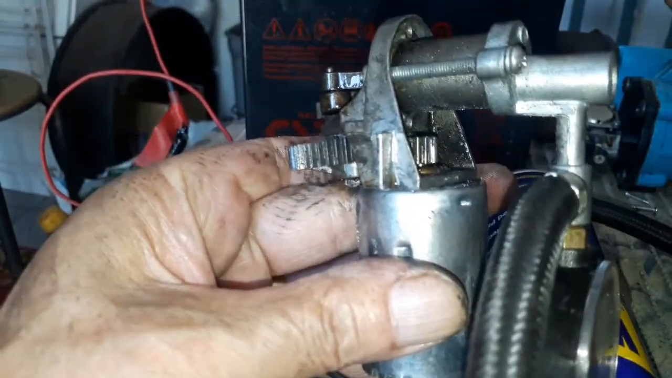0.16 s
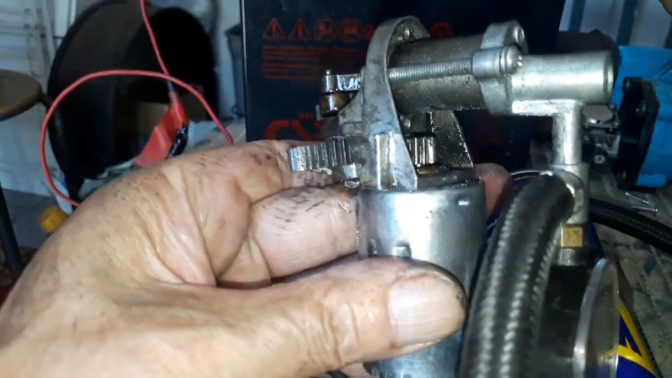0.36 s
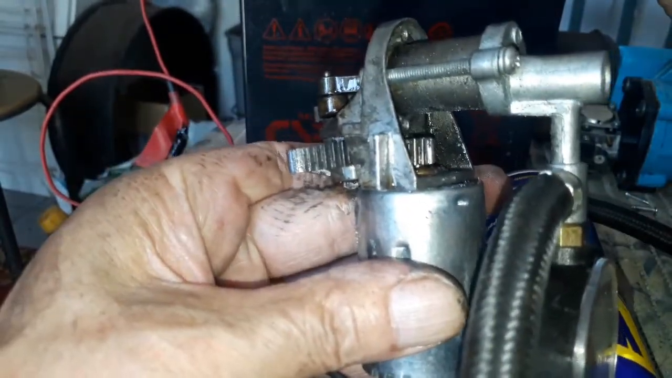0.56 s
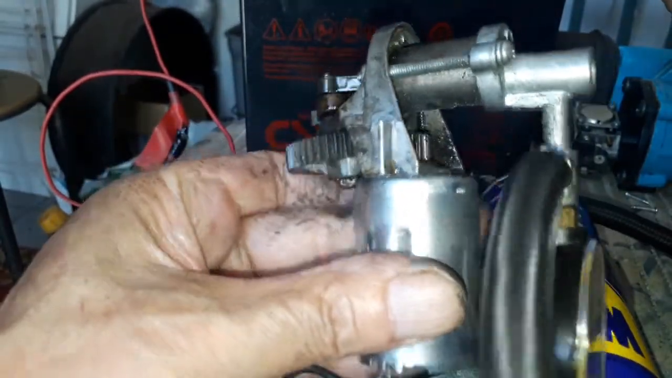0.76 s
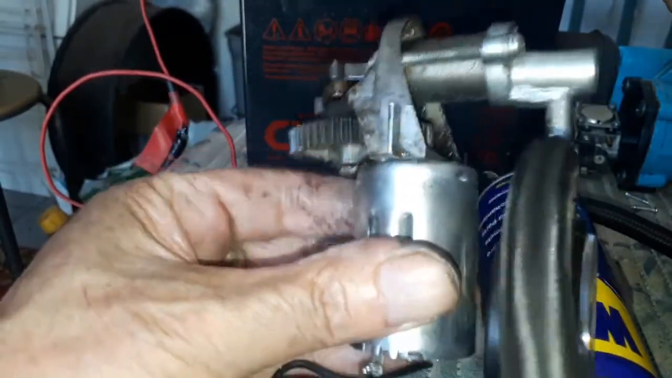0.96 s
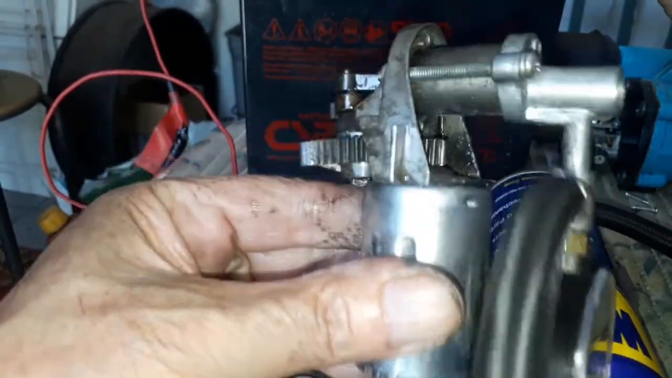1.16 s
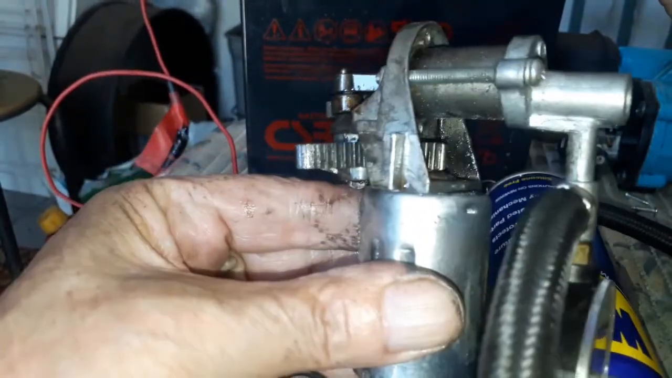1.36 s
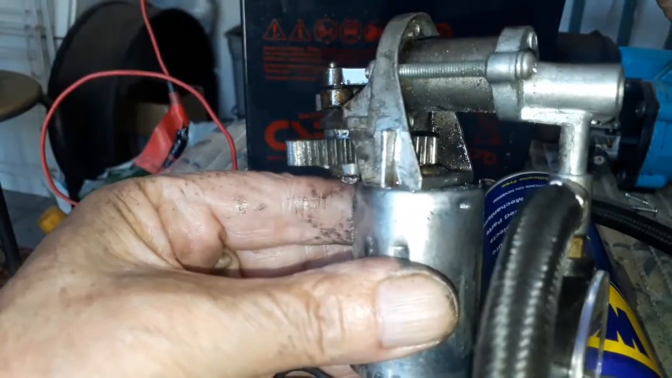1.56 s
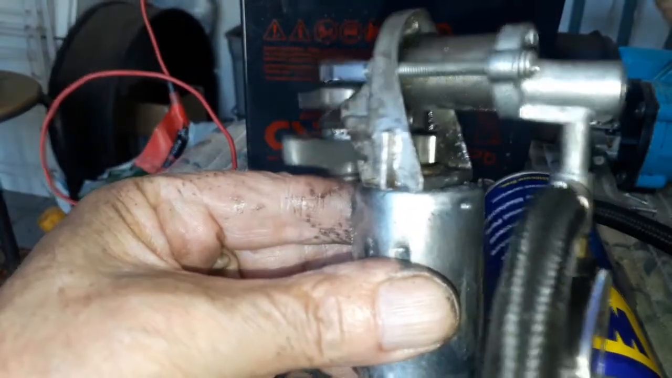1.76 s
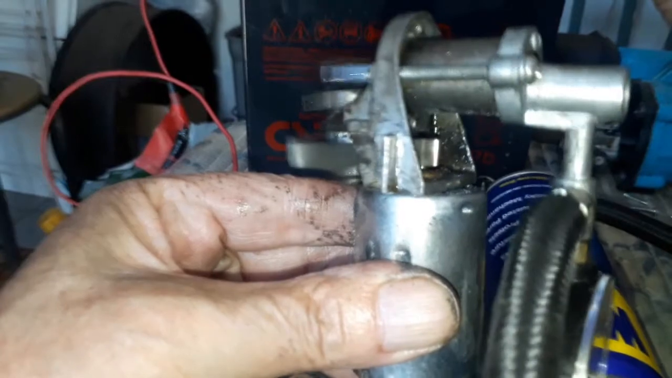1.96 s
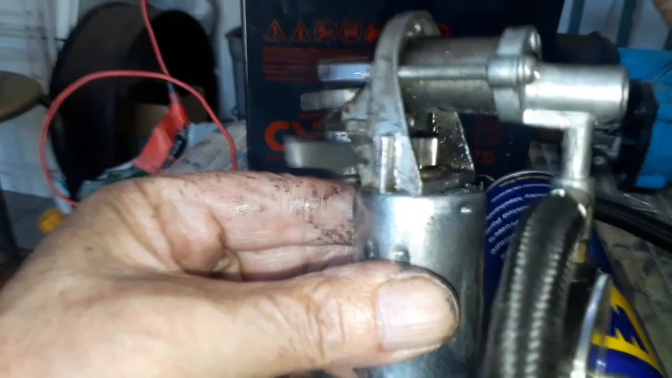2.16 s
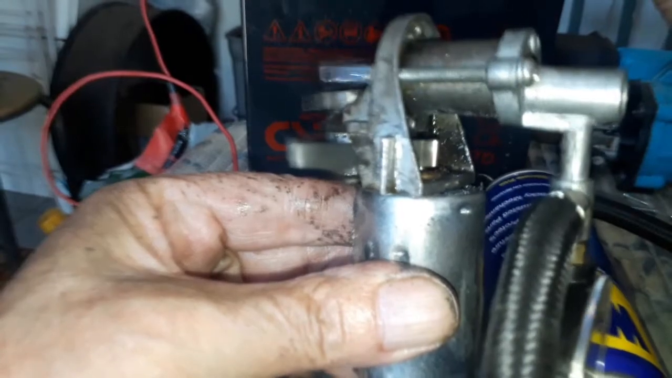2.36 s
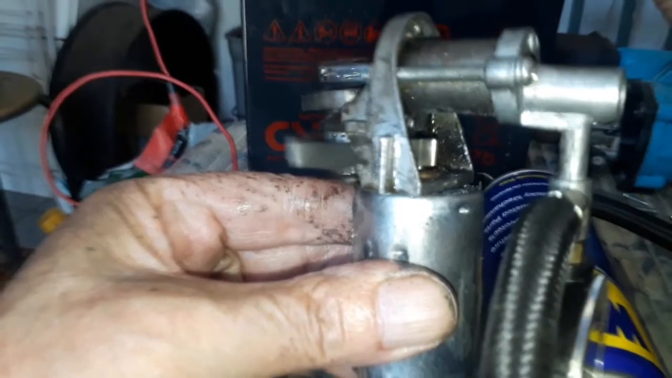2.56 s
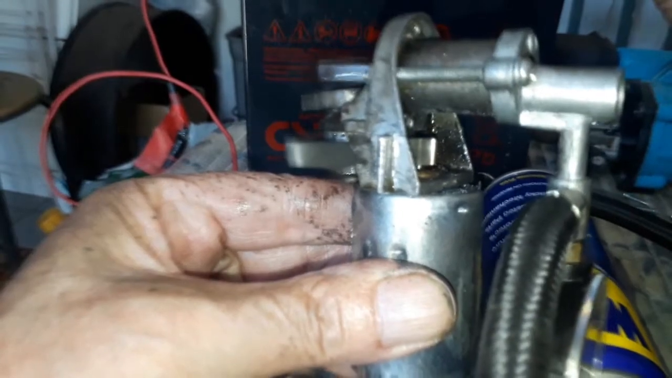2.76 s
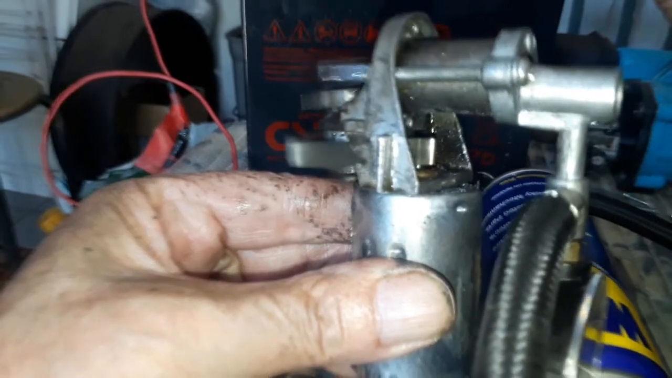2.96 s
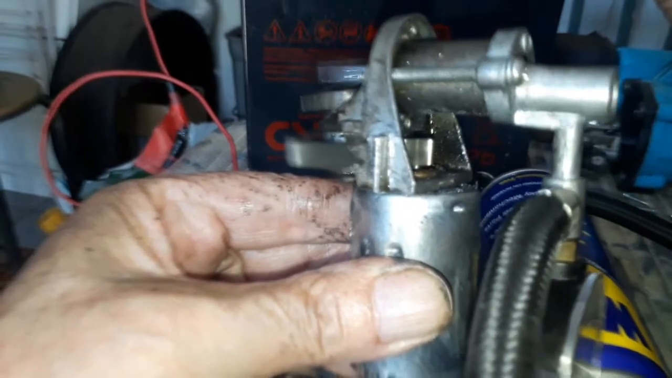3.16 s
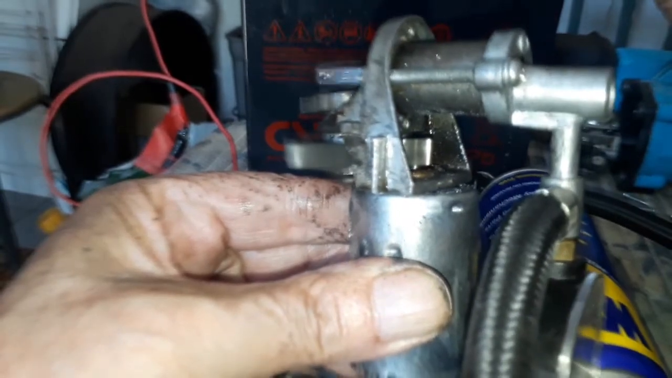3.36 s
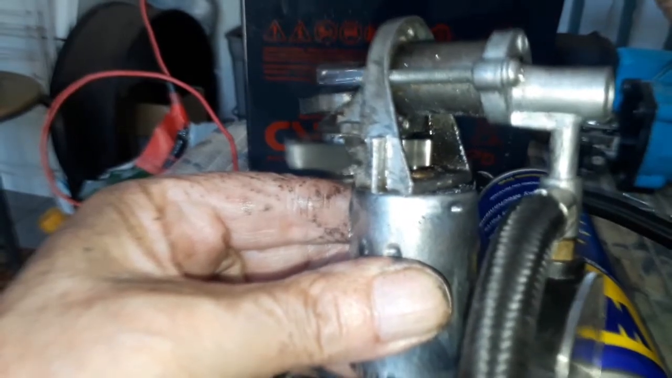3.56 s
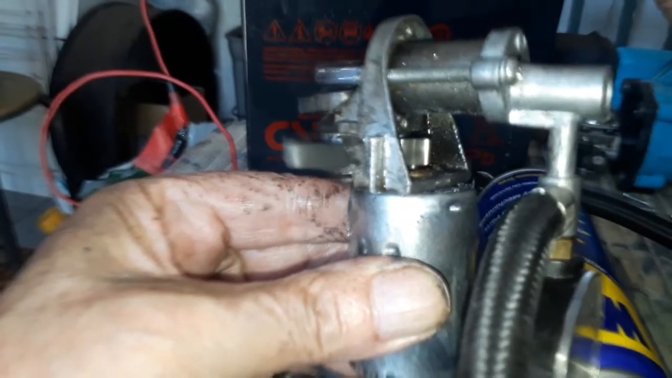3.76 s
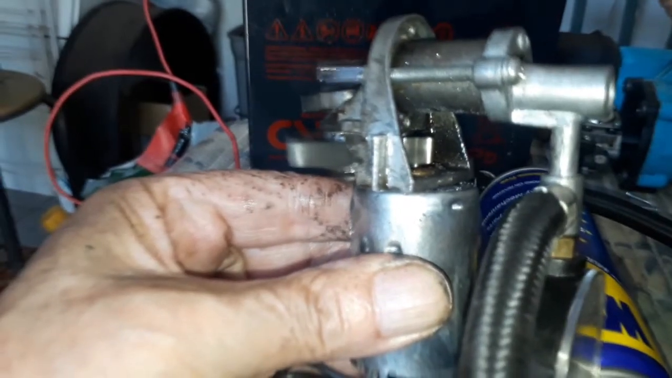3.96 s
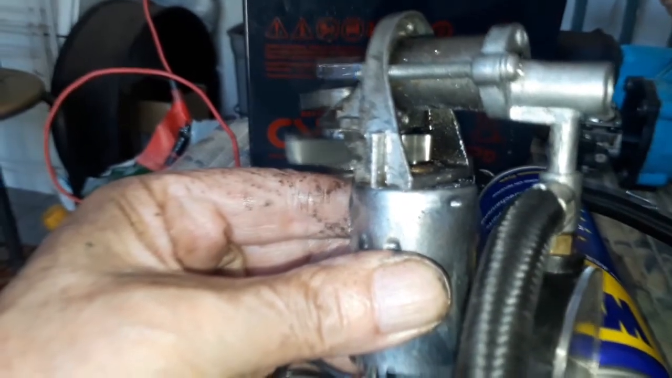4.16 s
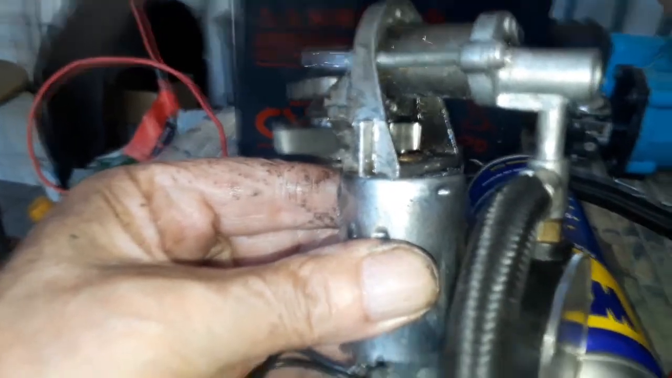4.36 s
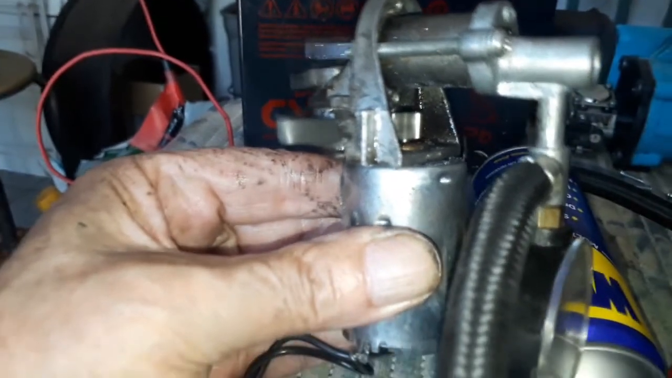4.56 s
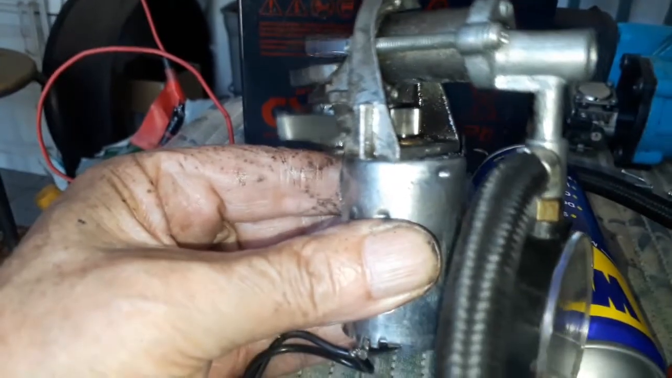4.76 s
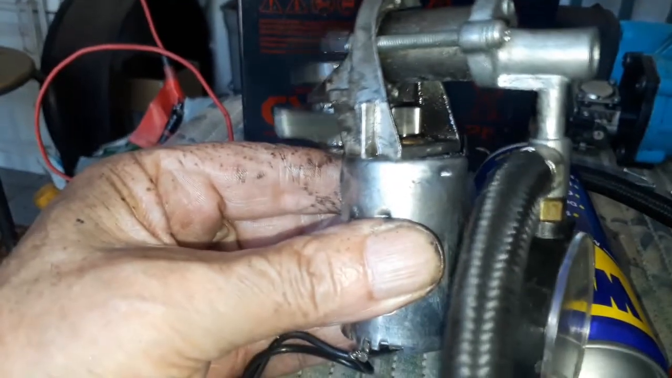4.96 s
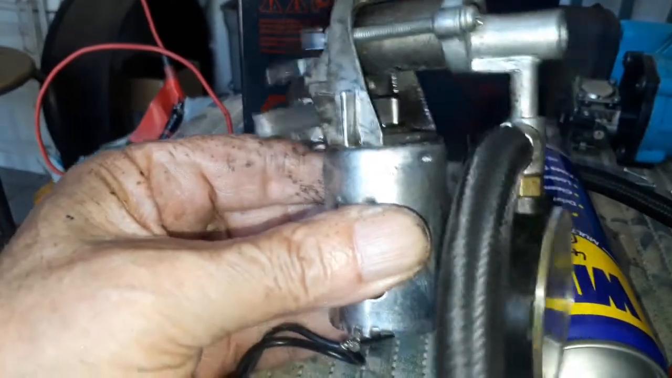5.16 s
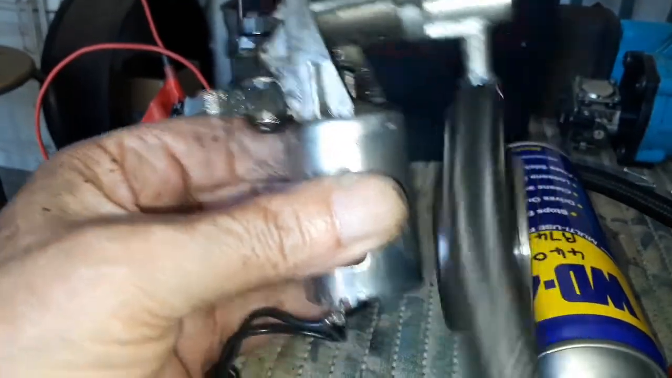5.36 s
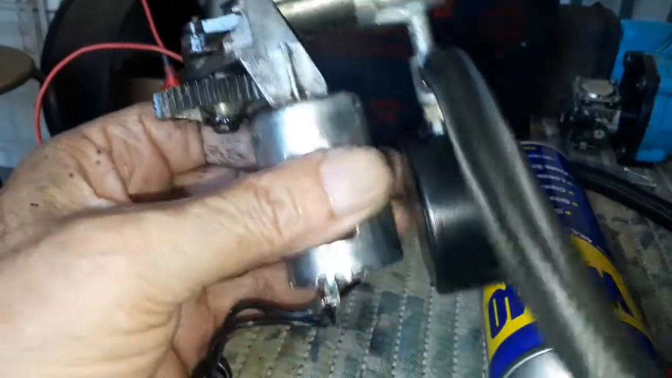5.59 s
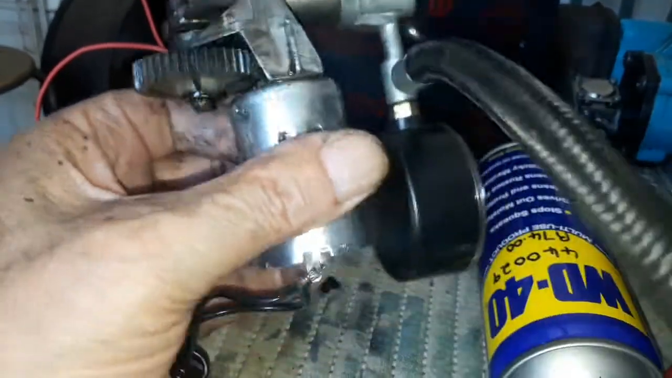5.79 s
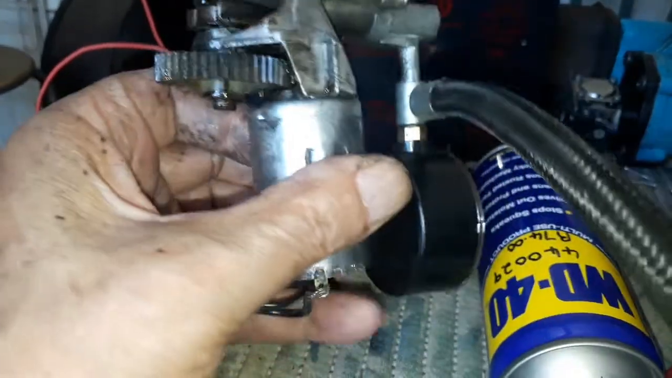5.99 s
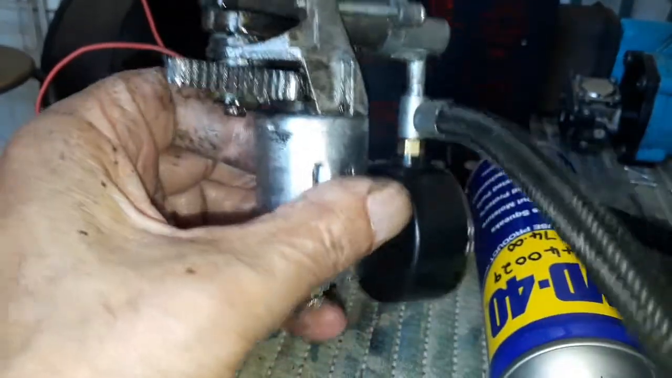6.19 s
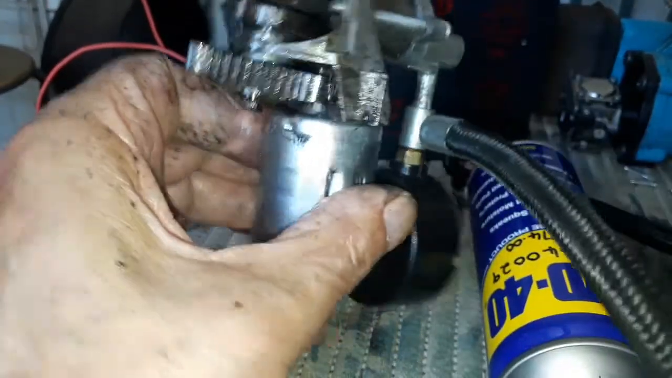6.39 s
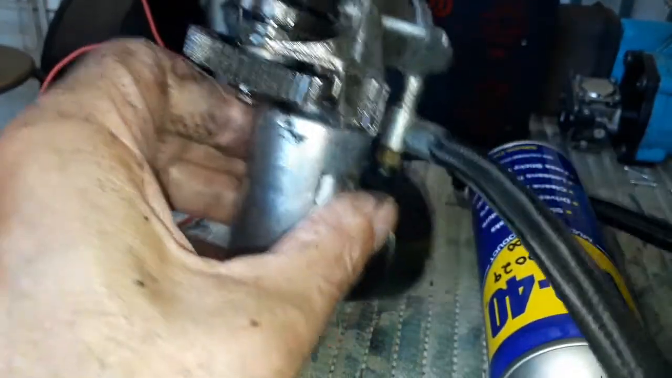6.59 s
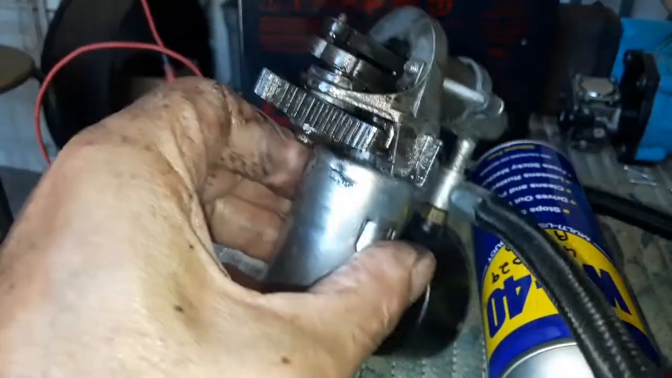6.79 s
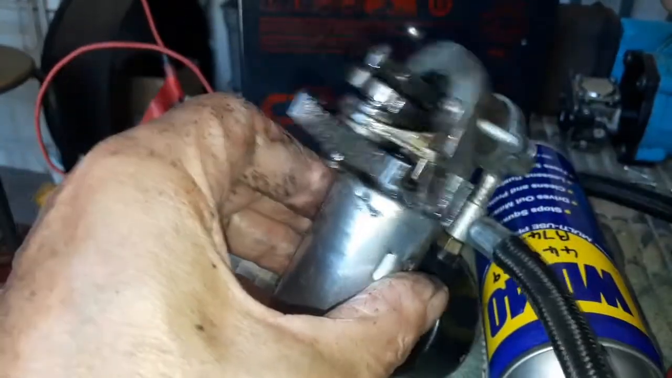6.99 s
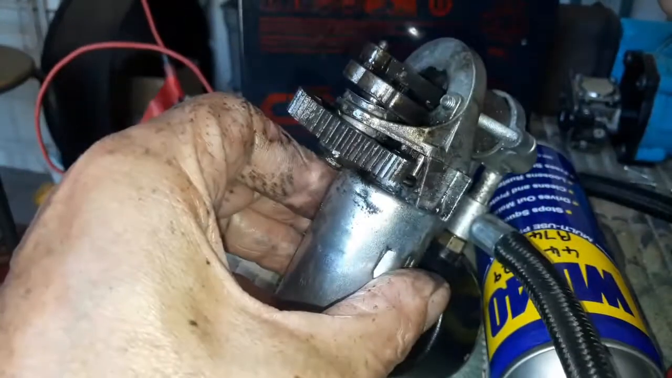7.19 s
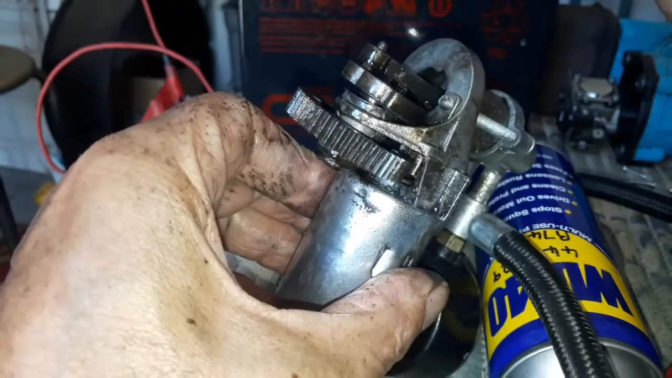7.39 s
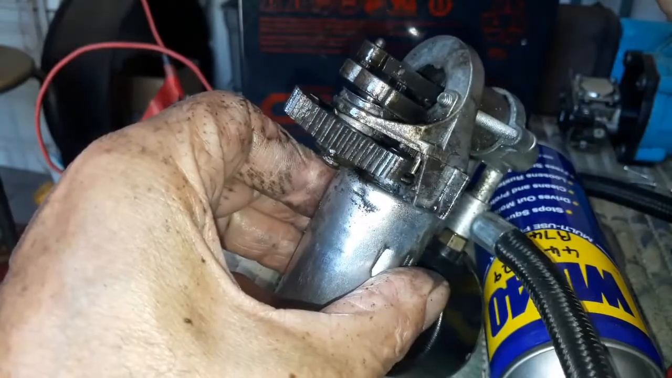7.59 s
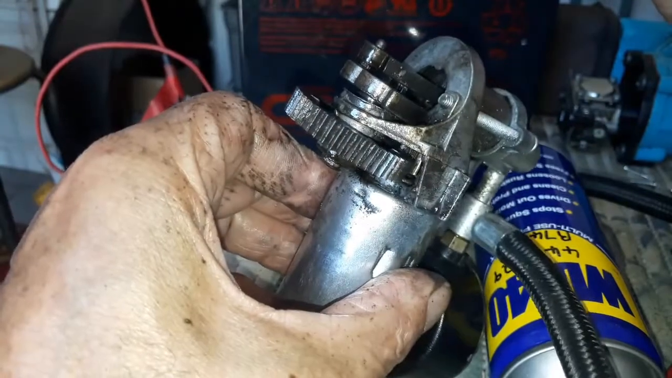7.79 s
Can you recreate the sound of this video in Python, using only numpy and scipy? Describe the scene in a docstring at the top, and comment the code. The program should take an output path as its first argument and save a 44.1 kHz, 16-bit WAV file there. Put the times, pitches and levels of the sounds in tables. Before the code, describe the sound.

A near-silent room with slight handling noise is broken by a small motor-driven pump spinning up almost instantly. Its loose rod hammers in a dense, harsh metallic buzz, with grinding gears and low-mid hum, very near and loud. Small momentary dips turn to watery ringing. After switch-off the rattle slows and thickens into thuds, ending in a quick flurry of taps, then faint clicks and rubs.

```python
"""In a small quiet workshop, a bare piston compressor is held in a hand close to the microphone.
It runs for about three seconds and coasts to a stop. A motor drives its crank through a gear, heard as
hum and scraping noise. The loose rod knocks at both ends of each stroke and rings the cast body.
At moments the sound dips and a brief swell of ringing noise bands takes its place. Before and after
the run, the hand shifts its grip: struck tones make faint clicks and ticks, noise makes bumps and rubs."""
import sys
import numpy as np
from scipy import signal
from scipy.fft import rfft, irfft, next_fast_len
from scipy.io import wavfile
from scipy.ndimage import map_coordinates

SR = 44100
rng = np.random.default_rng(int(sys.argv[2]) if len(sys.argv) > 2 else 0)


def bounce(signal):
    """Save signal as a 16-bit WAV file at the path given by the first command-line argument."""
    frames = np.transpose(np.atleast_2d(signal))
    limited = np.clip(frames, -1, 1)
    pcm = np.round(limited * 32767).astype(np.int16)
    wavfile.write(sys.argv[1], SR, pcm)


N = 345556

# Levels in the tables are relative: the functions set the final loudness.
# the two ends of the stroke: (place [turns], extra when slow [turns], level [dB],
# timing scatter [s], time to fall 60 dB [s], rebound level [dB])
STROKE_ENDS = [(-.005, -.02, 1.5, 0.00023, 0.0092, -4.5), (.465, .1, -0.2, 0.00034, .0095, -10)]
# extra single knocks during spin-up and coasting, some on the return stroke: (time [s], level [dB])
SINGLE_KNOCKS = [(1.762, -25.5), (1.789, -10.5), (1.796, -11.5), (1.821, -14.5), (4.792, -18), (4.865, -17),
                 (5.034, -19), (5.18, -33.5)]
# moments when the sound dips and smears into ringing noise: (time [s], level [dB])
SMEAR_TIMES = [(2.177, -10.5), (2.304, -12.5), (2.455, -15), (2.669, -15), (2.775, -13), (3.628, -14),
               (3.67, -13.5), (4.35, -12), (4.675, -13), (4.857, -15.5), (5.097, -21.5)]
# hum tones; 4.6 is the motor shaft: (multiple of crank speed [-], level [dB])
HUM_TONES = [(1, -8), (3, -3), (4, -20), (4.6, -0.5), (5, 4), (6, -22), (7, -0.5), (8, -15), (9, -1),
             (10, 0.5), (11, -7), (12, -1), (13, 0), (13.8, 0.5), (14.6, -4.5), (23, -16)]
# broad colour of the knocks: (frequency [Hz], level [dB per Hz])
KNOCK_COLOUR = [(25, -44.5), (80, -33.5), (140, -22.5), (230, -12), (360, -13), (650, -8), (1050, -10.5),
                (1600, -6), (2600, 1.5), (6200, 1), (7300, 1.5), (7900, -6.5), (9600, -13.5),
                (16000, -13.5)]
# resonances and dips of the cast body: (frequency [Hz], width [Hz], lift [dB])
BODY_RESONANCES = [(657, 16, 8.5), (1974, 190, 1.5), (3080, 440, 2), (3380, 95, -3.5), (3980, 450, 3.5),
                   (4260, 120, -4.5), (5490, 260, 4), (6455, 210, 4), (6860, 440, 4), (8840, 550, 3.5),
                   (10540, 230, 6.5), (11700, 2100, 5.5), (12590, 800, 3.5)]
# colour of the gear noise: (frequency [Hz], level [dB per Hz])
GEAR_COLOUR = [(35, -46), (80, -27.5), (150, -33), (240, -5.5), (350, -21.5), (650, -8), (1060, -11.5),
               (2100, -3.5), (3000, -7.5), (4420, -6.5), (6900, -2), (8000, -13), (9600, -16), (12700, -17),
               (16000, -16)]
# clicks of loose metal parts: (time [s], level [dB], strongest around [Hz])
CLICK_TIMES = [(.249, -61, 2200), (.749, -56, 2200), (.996, -47.5, 1900), (1.026, -41.5, 5200),
               (1.523, -51.5, 2940), (5.807, -42, 1500), (5.837, -42, 1100), (5.849, -44.5, 4270),
               (6.025, -39.5, 762), (6.271, -55.5, 6000), (6.686, -49.5, 900), (6.997, -48.5, 699),
               (7.025, -59.5, 1500)]
# tones of the loose metal parts: (frequency [Hz], level [dB], time to fall 60 dB [s])
METAL_TONES = [(610, 1.5, 0.04), (760, 4.5, 0.025), (1090, -11, .04), (1530, -8, 0.21), (2000, 1.5, 0.051),
               (2120, -6, 0.066), (2752, -11, 0.026), (4000, -11, 0.033), (4470, -5, 0.03),
               (5770, -17, 0.033)]
# hollow ticks of the hose and gauge: (time [s], level [dB])
TICK_TIMES = [(5.517, -61), (6.464, -47.5), (7.31, -41)]
# hollow tones of the hose and gauge: (frequency [Hz], level [dB], time to fall 60 dB [s])
HOLLOW_TONES = [(415, -16, 0.039), (756, -29, .04), (1043, 4, 0.023), (1138, 3, 0.029), (2070, -16, .04),
                (3700, -21.5, .03)]
# soft bumps of the hand: (time [s], level [dB], treble cut-off [Hz])
HAND_BUMPS = [(0.567, -59, 180), (1.012, -50, 170), (1.236, -45.5, 288), (1.526, -59, 450),
              (5.519, -60, 700), (5.842, -54, 260), (6.466, -58, 400), (6.69, -57, 220), (6.743, -53, 300),
              (7.003, -50, 130)]
# fingers sliding on metal: (time [s], level [dB], half length [s], strongest around [Hz])
FINGER_RUBS = [(0.872, -65.5, 0.022, 602.3), (0.993, -60, 0.02, 2010), (1.113, -61, 0.033, 500),
               (1.108, -71, .025, 5500), (5.677, -67.5, .018, 5600), (5.782, -69, 0.061, 1300),
               (6.008, -63, .045, 856), (6.434, -72, 0.027, 1097), (6.776, -68.5, 0.036, 1100),
               (6.981, -56, .028, 750)]
# colour of skin sliding on metal: (frequency [Hz], level [dB per Hz])
SKIN_COLOUR = [(120, -35), (200, -13), (363, -5), (708, -7), (1170, -8.5), (2060, -14.5), (3350, -16.5),
               (4010, -17.5), (6770, -14), (9550, -32.5), (15000, -26)]
# colour of the quiet background: (frequency [Hz], level [dB per Hz])
AIR_COLOUR = [(20, -20), (45, -28.5), (75, -14), (120, -8), (190, -10), (280, -13.5), (420, -17.5),
              (1060, -24), (3000, -27.5), (5500, -32), (6800, -30), (8200, -39), (11500, -34),
              (16000, -33.5)]
# how long the room's echo lasts: (frequency [Hz], time to fall 60 dB [s])
ROOM_DECAY = [(150, .22), (1500, .3), (2100, .42), (3000, .3), (6500, .3), (14000, .22)]
# the microphone's low cut on the hum: (frequency [Hz], gain [dB])
MICROPHONE_LOW_CUT = [(20, -32.5), (48, -15.5), (95, -12.5), (140, 0.5)]
# slow contacts thud more: (frequency [Hz], gain [dB])
THUD_COLOUR = [(100, -11.5), (230, 10.5), (360, -1.5), (550, 7), (800, 2), (1800, 2.5), (2100, 3.5),
               (2600, -1), (4500, -1.5), (5600, 1), (8000, -4.5)]
# broad tilt of the smears: (frequency [Hz], gain [dB])
SMEAR_COLOUR = [(250, -15), (700, -13.5), (1300, -18.5), (2100, 3.5), (7000, 5.5), (9500, -4.5),
                (14000, -2)]
# the noisy crack in a click: (frequency [Hz], level [dB per Hz])
CRACK_COLOUR = [(200, -12.5), (700, 2), (2000, -9.5), (5000, -7.5), (7000, -11), (9000, -21.5)]
# narrow bands that stand out in every smear: (frequency [Hz], width [Hz], lift [dB])
SMEAR_BANDS = [(232, 30, 17), (672, 60, 17), (2120, 120, 8), (7960, 140, 6), (9900, 200, 8),
               (10900, 250, 11)]

# motor switched on and off [s]; full crank speed [turns per s]; crank position at rest [turns]
ON_S, OFF_S, CRANK_HZ, REST_TURN = 1.7581, 4.6716, 48.297, .3745
# time constants of spin-up and coasting [s]; dry friction over viscous drag at full speed
SPIN_UP_S, COAST_S, DRY_FRICTION = .0863, .7924, .7026
# drive shared by knocks and gears, and level of the hum, once the run is steady [dB]
DRIVE_DB, HUM_DB = -17, -39
# the run starts harder and settles: extra drive [dB], extra hum [dB], settling time [s]
START_DRIVE_DB, START_HUM_DB, SETTLE_S = 3.0, 3, .4
# coasting: speed around which the drive weakens [share of full]; power of speed for the hum
WEAK_SPEED, HUM_POWER = 0.36, 2.5
GRIND_POWER = 0.4  # power of speed for the gear noise, on top of the drive
# the crank rocks to rest: first knock [s], first gap [s], each gap over the one before
ROCK_S, ROCK_GAP_S, ROCK_SHRINK = 5.25, .0185, .85
ROCK_DB, ROCK_LOSS_DB = -27.5, 2  # first knock, loss per knock
# one bounce after each rod knock, later when slow: delay at full speed [s], scatter [s], power of speed
REBOUND_S, REBOUND_SCATTER_S, REBOUND_POWER = .0029, 0.00069, .7
TOP_HZ = 15950  # the recorder's band limit


def compressor():
    """Rattle and hum of the pump: the turning parts follow the crank and fade as it slows."""
    speed, turns = crank()
    strain = np.exp(-since(ON_S) / SETTLE_S)
    coasting, turning = clock() > OFF_S, clock() < ROCK_S
    weakening = speed * np.hypot(1, WEAK_SPEED) / np.hypot(speed, WEAK_SPEED)
    force = np.where(coasting, weakening, 1)
    drive = force * amp(DRIVE_DB + START_DRIVE_DB * strain)
    hum_level = speed ** np.where(coasting, HUM_POWER, 1) * amp(HUM_DB + START_HUM_DB * strain)
    gear_drive = turning * drive * speed ** GRIND_POWER
    rattle = knocks(turns, speed, drive) + gears(turns, gear_drive)
    return rattle, hum(turns, hum_level)


def crank():
    """Speed (share of full) and position (turns): the motor spins up, holds, then friction stops it."""
    spin_up = 1 - np.exp(-since(ON_S) / SPIN_UP_S)
    coast = (1 + DRY_FRICTION) * np.exp(-since(OFF_S) / COAST_S) - DRY_FRICTION
    speed = np.clip(spin_up * coast, 0, 1)
    return speed, REST_TURN + CRANK_HZ * np.cumsum(speed) / SR


def knocks(turns, speed, drive, knock_db=-1, single_t60=0.014):
    """The rod hits and rebounds at both ends of the stroke; each contact is a short crash in the body."""
    power, single = np.zeros(N), np.zeros(N)
    scatter_db, attack = 1.0, .002
    whole_turns = np.arange(1, turns[-1])
    for share, slow_lag, db, scatter, t60, rebound_db in STROKE_ENDS:
        slowness = 1 - np.interp(whole_turns + share, turns, speed)
        angles = whole_turns + share + slow_lag * slowness
        contacts = np.searchsorted(turns, angles[angles < turns[-1]])
        blow = fade(t60, attack) ** 2  # squared because powers are added
        luck = rng.standard_normal((len(whole_turns), 4))
        for i, (late, size, bounce_late, bounce_size) in zip(contacts, luck):
            s = i / SR + scatter * late
            flight = (REBOUND_S + REBOUND_SCATTER_S * bounce_late) / speed[i] ** REBOUND_POWER
            add(power, s, amp(db + scatter_db * size) ** 2 * blow)
            add(power, s + flight, amp(db + rebound_db + scatter_db * bounce_size) ** 2 * blow)
    for s, db in SINGLE_KNOCKS + rocking():
        add(single, s, amp(db) ** 2 * fade(single_t60, attack) ** 2)
    # the drive sets the level, scaled by the mean power between 2 and 4 s
    power *= (drive * amp(knock_db)) ** 2 / power[2 * SR:4 * SR].mean()
    # the slower the crank, the more each crash turns into a thud
    grit = rng.standard_normal((2, N))
    crashes = coloured(np.sqrt(power * speed) * grit[0], body_db)
    thud_noise = np.sqrt(power * (1 - speed) + single) * grit[1]
    thuds = coloured(thud_noise, lambda hz: body_db(hz) + along(THUD_COLOUR, hz))
    return (crashes + thuds) / coloured(grit[0, :SR], body_db).std()


def rocking(count=5):
    """Time (s) and level (dB) of the last knocks, each sooner after and weaker than the one before."""
    last_knocks = []
    for k in range(count):
        wait = ROCK_GAP_S * (1 - ROCK_SHRINK ** k) / (1 - ROCK_SHRINK)  # sum of shrinking gaps
        last_knocks.append((ROCK_S + wait, ROCK_DB - ROCK_LOSS_DB * k))
    return last_knocks


def body_db(hz):
    """Gain of the cast body: a broad colour with resonances on it."""
    return along(KNOCK_COLOUR, hz) + resonances_db(BODY_RESONANCES, hz)


def gears(turns, drive, grind_db=-11, mesh_depth=.1, shaft_depth=0.2):
    """Teeth scrape as they mesh, a little harder once in each turn of the motor shaft."""
    shaft, mesh = 4.6 * turns, 46 * turns  # shaft turns and tooth contacts so far
    mesh_swing = 1 + mesh_depth * np.cos(2 * np.pi * mesh)
    shaft_swing = 1 + shaft_depth * np.cos(2 * np.pi * shaft)
    return drive * amp(grind_db) * mesh_swing * shaft_swing * noise(GEAR_COLOUR)


def hum(turns, level, waver_db=0.4):
    """Piston and rotor shake the frame in step with the crank; the tones waver, the bass is cut."""
    tones = np.zeros(N)
    for multiple, db in HUM_TONES:
        phase = 2 * np.pi * (multiple * turns + rng.random()) + .12 * wobble(10)
        tones += amp(db + waver_db * wobble(11)) * np.sin(phase)
    tones /= tones[2 * SR:4 * SR].std()
    return coloured(level * tones, lambda hz: along(MICROPHONE_LOW_CUT, hz))


def smears(smear_db=-1, half=0.0135, spacing_hz=170):
    """Brief swells of noise in which narrow bands ring out, some fixed, some new each time."""
    out = np.zeros(N)
    t = np.arange(SR // 8) / SR
    bell = np.exp(-((t - t.mean()) / half) ** 2)
    for s, db in SMEAR_TIMES:
        knots = rng.standard_normal(SR // 50)

        def bands(hz):
            """Knock colour, tilt and fixed bands, with a random ripple that is weaker in the bass."""
            ripple = 10 * np.tanh(map_coordinates(knots, [hz / spacing_hz])) * hz / (hz + 700)
            return body_db(hz) + ripple + along(SMEAR_COLOUR, hz) + resonances_db(SMEAR_BANDS, hz)

        ringing = unit(coloured(rng.standard_normal(len(t)), bands))
        add(out, s - t.mean(), amp(db + smear_db) * bell * ringing)
    return out


def clicks(click_db=-3, crack_db=-5, crack_t60=0.03, focus_db=13, octaves=0.83, tick_db=-3):
    """Loose fittings click with a short crack; hose and gauge give hollow ticks."""
    out = np.zeros(N)
    shape = fade(crack_t60, attack=0.00056)
    for s, db, centre_hz in CLICK_TIMES:
        colour = lambda hz: focus_db * focus(hz, centre_hz, octaves)
        crack_colour = lambda hz: along(CRACK_COLOUR, hz) + colour(hz)
        crack = shape * unit(coloured(rng.standard_normal(len(shape)), crack_colour))
        metal = ring(METAL_TONES, attack=0.00031, colour=colour)
        add(out, s, amp(db + click_db) * (metal + amp(crack_db) * crack))
    for s, db in TICK_TIMES:
        add(out, s, amp(db + tick_db) * ring(HOLLOW_TONES, attack=0.0022))
    return out


def handling():
    """The hand shifts on the pump: dull bumps of the palm and grainy rubs of the fingers."""
    return bumps() + rubs()


def bumps(bump_t60=0.055):
    """Soft flesh meets the body: short bursts of noise with their treble cut off."""
    out = np.zeros(N)
    shape = fade(bump_t60, attack=0.0012)
    for s, db, edge_hz in HAND_BUMPS:
        treble_cut = lambda hz: 10 * np.log10(1 + (hz / edge_hz) ** 4)
        flesh = lambda hz: along([(30, -46), (55, -13), (110, 4)], hz) - treble_cut(hz)
        add(out, s, amp(db) * shape * unit(coloured(rng.standard_normal(len(shape)), flesh)))
    return out


def rubs(grain_db=3, focus_db=10, octaves=.3):
    """Sliding skin makes swells of noise around one pitch, roughened by a fast random flutter."""
    out = np.zeros(N)
    t = np.arange(SR // 3) / SR
    for s, db, half, centre_hz in FINGER_RUBS:
        colour = lambda hz: along(SKIN_COLOUR, hz) + focus_db * focus(hz, centre_hz, octaves)
        skin = unit(coloured(rng.standard_normal(len(t)), colour))
        bell = np.exp(-((t - t.mean()) / half) ** 2)
        add(out, s - t.mean(), amp(db) * bell * skin)
    return out * unit(amp(grain_db * wobble(200)))


def room(x):
    """The workshop's echo: a tail of fading noise, starting 4 ms late; each pitch fades at its own rate."""
    hz, t, z = signal.stft(rng.standard_normal(SR // 2), SR, nperseg=256)
    fading = amp(-60 * t / along(ROOM_DECAY, hz)[:, None])
    tail = signal.istft(z * fading, SR, nperseg=256)[1]
    echo = np.pad(tail, (SR // 250, 0)) / np.linalg.norm(tail)
    return signal.fftconvolve(x, echo)[:N]


def background(air_db=-68):
    """The quiet of the workshop: steady, softly coloured noise."""
    return amp(air_db) * noise(AIR_COLOUR)


def amp(db):
    """Decibels to gain."""
    return 10 ** (np.asarray(db) / 20)


def unit(x):
    """Scale to an average (rms) level of 1."""
    return x / np.sqrt(np.mean(x ** 2) + 1e-20)


def clock():
    """The time of every sample (s)."""
    return np.arange(N) / SR


def since(s):
    """Seconds since time s, zero before it."""
    return np.maximum(clock() - s, 0)


def along(points, hz):
    """Read a curve of (Hz, value) points on a log frequency axis."""
    f, v = np.transpose(points)
    return np.interp(np.log(hz + 1), np.log(f + 1), v)


def resonances_db(rows, hz):
    """The summed lift of (Hz, width Hz, dB) resonances."""
    return sum(db / (1 + (2 * (hz - centre) / width) ** 2) for centre, width, db in rows)


def focus(hz, centre_hz, octaves):
    """A bell on the log-frequency axis, 1 at its centre."""
    return 1 / (1 + (np.log2((hz + 1) / centre_hz) / octaves) ** 2)


def wobble(rate):
    """A smooth random curve with the given number of random points a second."""
    knots = rng.standard_normal(int(N * rate / SR) + 4)
    steps = np.arange(0, len(knots), 1 / 8)
    return np.interp(clock() * rate, steps, map_coordinates(knots, [steps]))


def coloured(x, gain_db):
    """Filter x by gain_db(Hz) without any sound ahead of its cause (a minimum-phase filter)."""
    m = 2 * next_fast_len(len(x) // 2 + 4096)
    gain = amp(gain_db(np.fft.rfftfreq(m, 1 / SR)))
    cepstrum = irfft(np.log(gain + 1e-6))
    # folding the cepstrum forward in time makes the filter causal
    cepstrum[1:m // 2] *= 2
    cepstrum[m // 2 + 1:] = 0
    return irfft(rfft(x, m) * np.exp(rfft(cepstrum)), m)[:len(x)]


def noise(spectrum):
    """Noise of rms 1 with the given spectrum."""
    return unit(coloured(rng.standard_normal(N), lambda hz: along(spectrum, hz)))


def add(track, s, sound):
    """Mix a sound into the track at time s."""
    part = track[max(round(s * SR), 0):][:len(sound)]
    part += sound[:len(part)]


def fade(t60, attack):
    """The envelope of a blow, peak 1: a quick rise, then a fall of 60 dB in t60 seconds."""
    t = np.arange(SR // 4) / SR
    shape = amp(-60 * t / t60) * (1 - np.exp(-t / attack))
    return shape / shape.max()


def swell(s, half):
    """A bell-shaped envelope around time s."""
    return np.exp(-np.minimum(((clock() - s) / half) ** 2, 50))


def ring(modes, attack, colour=lambda hz: 0):
    """Struck tones at new random strengths, weighted by colour(Hz) in dB; peak 1."""
    t = np.arange(SR // 4) / SR
    sound = np.zeros(len(t))
    for hz, db, t60 in modes:
        strength = amp(db + rng.normal(0, 3.04) + colour(hz))
        sound += strength * fade(t60, attack) * np.sin(2 * np.pi * (hz * t + rng.random()))
    return sound / np.abs(sound).max()


def scene(room_db=-12, dip_db=-16, dip_half=0.0091):
    """Pump and hand in the room, over a quiet background; their level dips briefly under each smear."""
    rattle, buzz = compressor()
    near = rattle + clicks() + handling()
    dip = amp(dip_db * sum(swell(s, dip_half) for s, _ in SMEAR_TIMES))
    dipped = dip * (near + buzz + amp(room_db) * room(near))
    return (dipped + smears() + background())[None]


def record(dry):
    """The recorder clips at full scale and keeps nothing above its band limit."""
    m = next_fast_len(N + SR // 2)
    kept = np.fft.rfftfreq(m, 1 / SR) < TOP_HZ
    return irfft(rfft(np.clip(dry, -1, 1), m) * kept, m)[:, :N]


dry = scene()
out = record(dry)
bounce(out)
```